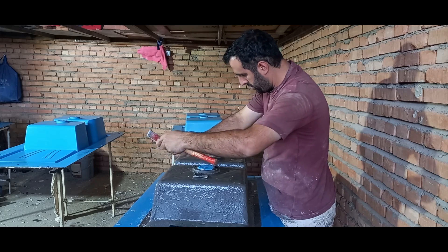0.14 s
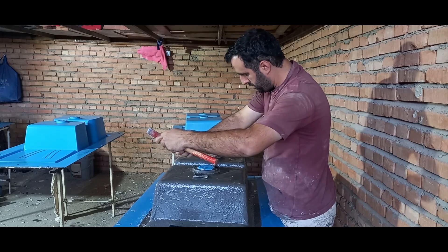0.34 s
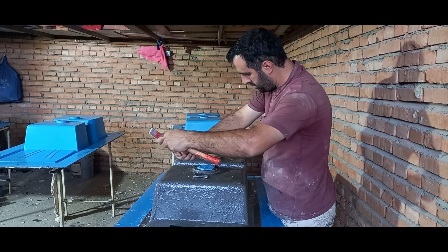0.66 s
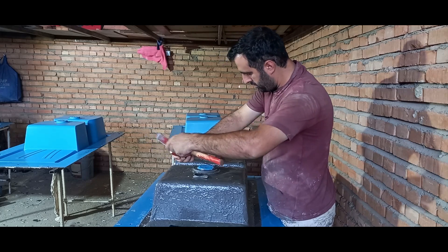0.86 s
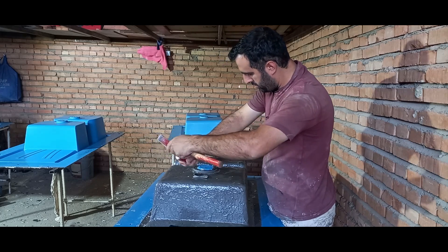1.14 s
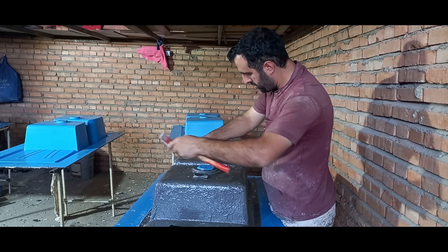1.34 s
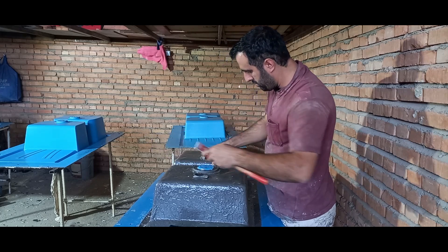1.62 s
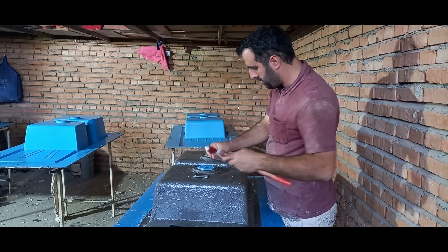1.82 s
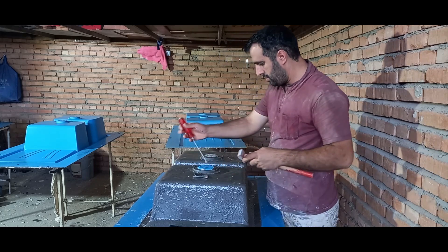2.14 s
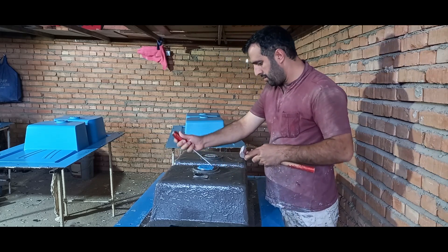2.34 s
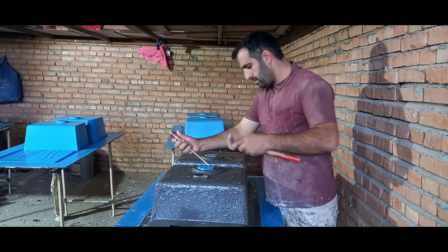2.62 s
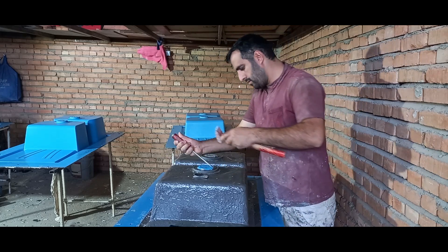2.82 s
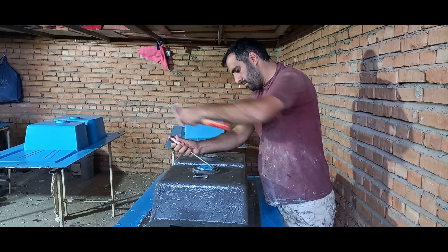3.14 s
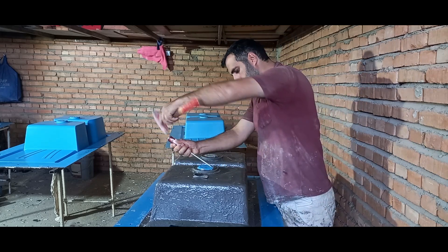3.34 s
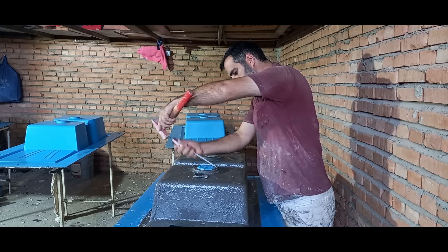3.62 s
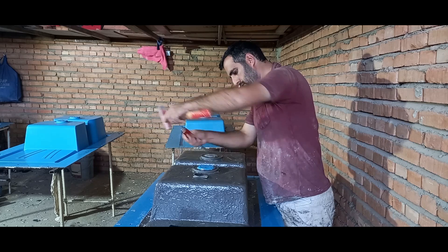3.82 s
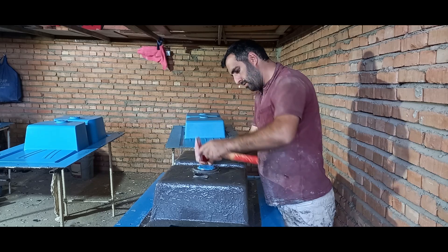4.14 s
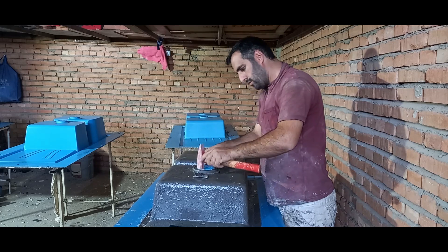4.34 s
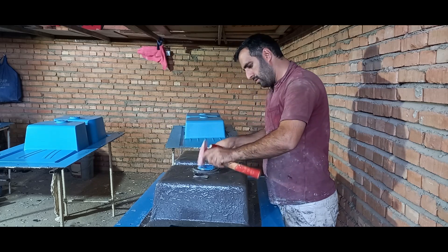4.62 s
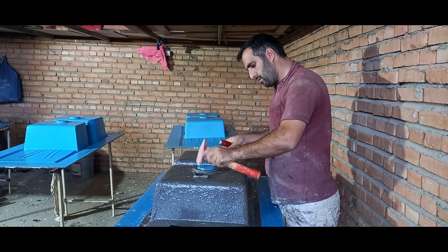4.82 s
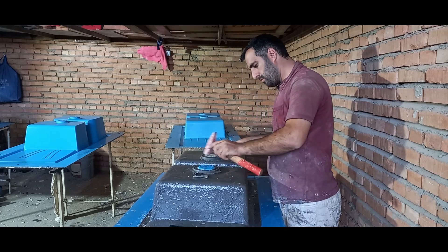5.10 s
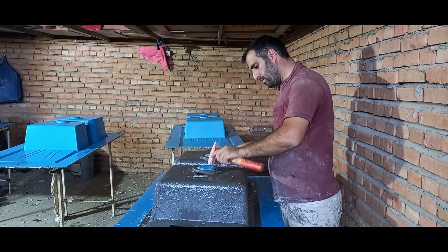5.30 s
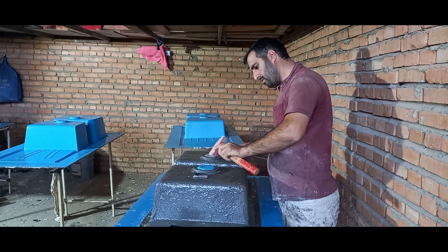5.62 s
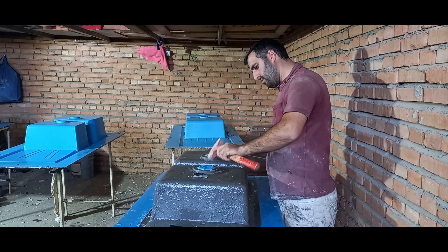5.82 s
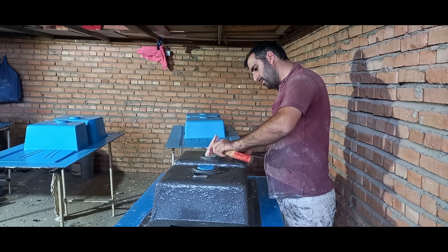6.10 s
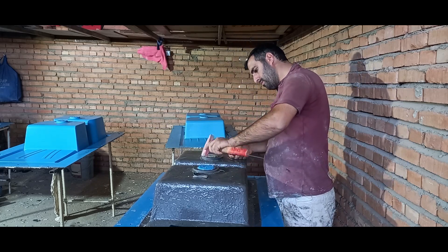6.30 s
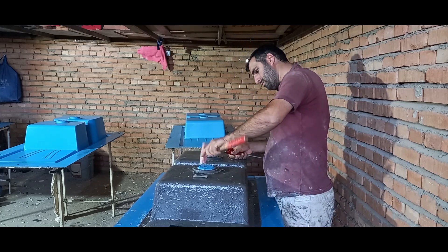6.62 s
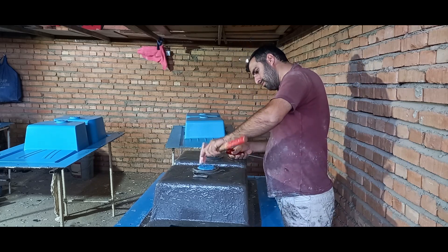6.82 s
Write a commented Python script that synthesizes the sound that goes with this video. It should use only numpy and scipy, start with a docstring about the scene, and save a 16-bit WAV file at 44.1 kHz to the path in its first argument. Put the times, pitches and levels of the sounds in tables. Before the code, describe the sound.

A hammer works on a hollow sink: a fading chisel blow, light blade contact, three cracking steel strikes, then metallic clinks and hand rubs. The blade knocks and scrapes briefly, another hard strike cracks, and a dozen woody taps follow, some bright at the edge, some fuller, with tiny chips pattering. Reverberant brick room, low hum, nearby stereo pickup with loud blows held down by limiting.

```python
"""A hammer drives a screwdriver into hardened resin on an upturned composite sink, in a brick workshop.
Over a low rumble, one chisel strike dies away, the blade is set down, and sharp strikes follow.
Tools clink and hands rub the grips; the blade lands again and skids; one more strike and a clink follow.
Then blunt taps drum on the bowl and make loose chips hop. Hits are sums of decaying modes and noise bursts,
each placed in a reverberant room; a limiter ducks the loud blows and lets the room swell back."""
import sys
import numpy as np
from scipy import signal
from scipy.fft import rfft, irfft, next_fast_len
from scipy.io import wavfile
from scipy.ndimage import uniform_filter1d, minimum_filter1d, map_coordinates

SR = 44100
rng = np.random.default_rng(int(sys.argv[2]) if len(sys.argv) > 2 else 0)


def generate_wav(signal):
    """Clip the signal to [-1, 1] and save it as 16-bit WAV at the path in sys.argv[1]."""
    frames = np.transpose(np.atleast_2d(signal))
    scaled = np.clip(frames, -1, 1) * 32767
    pcm = np.round(scaled).astype(np.int16)
    wavfile.write(sys.argv[1], SR, pcm)


N = 306936
AGE = np.arange(24576) / SR  # time since a hit (s)


def amp(db):
    """Logarithmic level: decibels to amplitude gain."""
    return 10 ** (np.asarray(db) / 20)


def along(points, hz):
    """Logarithmic frequency scale: (Hz, value) points interpolated between octaves."""
    f, v = np.transpose(points)
    return np.interp(np.log(hz + 1), np.log(f), v)


def onset_unit(x):
    """Onset level: scale a hit to rms 1 over its first hundredth of a second."""
    early_power = np.mean(x[..., :SR // 100] ** 2)
    return x / np.sqrt(early_power + 1e-20)


def add(track, s, sound):
    """Superposition: mix a sound into a track from time s, cutting what lies outside it."""
    start = round(s * SR)
    sound = sound[..., max(0, -start):]
    part = track[:, max(0, start):][:, :sound.shape[-1]]
    part += sound[..., :part.shape[1]]


def coloured(x, spectrum):
    """Minimum-phase filtering: the folded cepstrum gives a causal filter of the given spectrum."""
    n = x.shape[-1]
    gain = amp(along(spectrum, np.fft.rfftfreq(n, 1 / SR)))
    cepstrum = irfft(np.log(gain), n)
    cepstrum[1:n // 2] *= 2
    cepstrum[n // 2 + 1:] = 0
    return irfft(rfft(x) * np.exp(rfft(cepstrum)), n)


def evened(x, width_hz):
    """Spectral whitening: level out the chance peaks and dips of a noise's spectrum."""
    spectrum = rfft(x)
    width_bins = max(1, round(width_hz * AGE[-1]))
    power = uniform_filter1d(np.abs(spectrum) ** 2, width_bins)
    return irfft(spectrum / np.sqrt(np.abs(power) + 1e-12))


def ring(modes, attack=.001, scatter_db=1.5):
    """Modal superposition: decaying sinusoids, at slightly new strengths for each blow."""
    hz, db, t60 = np.transpose(modes)[:, :, None]
    db = db + scatter_db * rng.standard_normal(db.shape)
    t = AGE.astype(np.float32)
    decay_rate = np.float32(-np.log(1000) / t60)
    decay = np.exp(decay_rate * np.minimum(t, np.float32(3 * t60)))
    waves = decay * np.sin(np.float32(2 * np.pi * hz) * t)
    return onset_unit((amp(db) * waves).sum(0) * (1 - np.exp(-AGE / attack)))


def crack(spectrum, t60, apart=1.0, attack=0.0039):
    """Impact noise: a random burst, partly different at each ear; a second decay shortens t60."""
    shape = amp(-60 * AGE / t60) * (1 - np.exp(-AGE / attack))
    bursts = evened(rng.standard_normal((3, len(AGE))) * shape, 60)
    shared, left, right = bursts * amp(-60 * AGE / .15)
    return onset_unit(coloured(shared + apart * np.array([left, right]), spectrum))


def strokes(rows, rise, fall):
    """Envelope of friction: gain that swells up to each start, holds, and fades, in dB per second."""
    t = np.arange(N) / SR
    levels = []
    for s, length, db in rows:
        before = np.maximum(s - t, 0)
        after = np.maximum(t - s - length, 0)
        levels.append(db - rise * before - fall * after)
    return amp(np.max(levels, 0).clip(-200))


# likeness of the two sides in a diffuse field: frequency_hz, left_right_correlation [-1 to 1]
ROOM_CORRELATION = [(100, 0.9), (300, 0.87), (700, 0.45), (1300, 0.024), (2500, 0.091), (5000, 0)]


def diffuse(size):
    """Diffuse field: noise from all sides, alike at left and right in the bass only."""
    correlation = along(ROOM_CORRELATION, np.fft.rfftfreq(size, 1 / SR))
    turn = np.arccos(np.clip(correlation, -1, 1)) / 2
    mid, side = rfft(rng.standard_normal((2, size))) * [np.cos(turn), np.sin(turn)]
    return irfft(np.array([mid + side, mid - side]), size)


# decay of the reverberation: frequency_hz, t60_s
ROOM_T60 = [(100, .6), (300, .39), (700, .43), (2000, .43), (5000, .39), (9000, .31), (16000, .27)]


def room_tail(build=0.0082):
    """Reverberant decay: diffuse noise of energy 1, even over frequency; the treble dies first."""
    hz, t, z = signal.stft(diffuse(len(AGE)), SR, nperseg=256)
    decay = amp(-60 * t / along(ROOM_T60, hz)[:, None])
    tail = signal.istft(z * decay, SR, nperseg=256)[1]
    fade_out = np.minimum(1, 2 - 2 * AGE / AGE[-1]) ** 2
    tail = evened(tail, 25.4) * (1 - np.exp(-AGE / build)) * fade_out
    return tail / np.linalg.norm(tail[0])


# early wall echoes: delay_s, left_db, right_db
WALL_ECHOES = [(.0055, -12.5, -13.5), (.0212, -14.5, -13), (.038, -23, -24.5), (.058, -9.5, -16)]


def in_room(hit, wet_db, lead=2, left_db=0.3):
    """Room response: direct sound, earlier (in samples) and louder at left, wall echoes, diffuse tail."""
    response = amp(wet_db) * room_tail()
    response[[0, 1], [0, round(lead)]] += amp([left_db, -left_db])
    # rough brick scatters the treble, so that only the bass comes back as a clear echo
    echo = signal.windows.hann(21) / 10
    for delay, left_echo_db, right_echo_db in WALL_ECHOES:
        add(response, delay, amp([[left_echo_db], [right_echo_db]]) * echo)
    return signal.fftconvolve(hit, response, axes=1)


# spectrum of the workshop's background: frequency_hz, relative_level_db
HUM_SPECTRUM = [(25, -40), (50, -19), (70, -12), (93, 0), (115, -11), (210, -14), (320, -20), (900, -22),
                (1500, -29), (3000, -37), (6000, -45), (10000, -50), (13000, -43), (16000, -45)]


def background(level_db=-43):
    """Stationary noise: a low steady rumble with faint hiss."""
    noise = coloured(diffuse(next_fast_len(N, real=True)), HUM_SPECTRUM)[:, :N]
    return amp(level_db) * noise / noise.std()


# hands shift on the tool grips: start_s (full level reached), length_s, level_db
RUBS = [(1.668, 0.023, -34.5), (1.89, 0.007, -35), (1.956, 0.0096, -39.5)]
RUB_RISE_DB_PER_S, RUB_FALL_DB_PER_S = 448, 270
# spectrum of their rub: frequency_hz, relative_level_db
GRIP_SPECTRUM = [(150, 1.5), (450, 3), (1000, -14), (2000, -6), (4000, -16.5), (8000, -19.5), (16000, -34)]


def handling(rough_db=3, catches_per_s=140):
    """Friction noise: palms rub over the tool grips at a randomly uneven level."""
    catch_times = [np.arange(N) * catches_per_s / SR]
    catches = map_coordinates(rng.standard_normal(N), catch_times, order=1)
    noise = coloured(diffuse(next_fast_len(N, real=True)), GRIP_SPECTRUM)[:, :N]
    rub = noise * amp(rough_db * catches)
    return strokes(RUBS, RUB_RISE_DB_PER_S, RUB_FALL_DB_PER_S) * rub / rub.std()


# tools clink and flakes land: start_s, strength_db,
# brightness_db (tick up, clack and steel ring down), ping_over_tick_db (before their own trims)
CLINKS = [(0.0782, -44, -4.5, -17), (0.4045, -55.5, 8, -15), (1.2618, -38.5, 12.5, -31),
          (1.3892, -30, 4, -21), (1.4948, -38.5, -4, -14), (1.6842, -30, 7, -10.5),
          (1.772, -46.5, -2.5, -12), (1.8543, -41.5, 3, -27), (1.8904, -43.5, -5, -18), (1.95, -31, 6, -8),
          (2.0059, -29.5, -1, -15), (2.0253, -19.5, -6, -20), (3.5437, -28, -7, -20), (3.656, -51, -1, -17)]
# modes of steel touching steel: frequency_hz, relative_level_db, t60_s
STEEL_MODES = [(990, -16, 0.013), (1400, -17, .02), (1790, 5, 0.017), (2640, 2, 0.02), (2960, -6, 0.025),
               (3700, 9.5, 0.037), (4440, 10.5, 0.025), (4580, 15, 0.012), (5290, 11.5, 0.021),
               (6000, 2, 0.04), (6650, 5.5, .03)]
# thin high ring of a light steel contact: frequency_hz, relative_level_db, t60_s
PING_MODES = [(5880, 8.5, 0.11), (7200, -1, 0.074), (13850, -7, .04), (14350, 10.5, .07)]
# spectra of a hard contact and of a small bright one: frequency_hz, relative_level_db
CLACK_SPECTRUM = [(300, -5.5), (800, 0), (1400, 2), (2000, 0), (3000, -2), (4500, -8), (8000, -18),
                  (16000, -56)]
FINE_TICK_SPECTRUM = [(1500, -6), (4000, 1), (7000, 4.5), (10000, -3), (14500, 2.5), (16000, -0.5)]
CLINK_T60_S = 0.039  # contact noise, before the burst's second decay


def clinks():
    """Light impact: small bright contacts of tools and flying flakes; brightness trades ring for tick."""
    track = np.zeros((2, N))
    for s, db, bright, ping in CLINKS:
        low = amp(-5) * ring(STEEL_MODES, attack=0.00044)
        low = low + amp(-1) * crack(CLACK_SPECTRUM, CLINK_T60_S, attack=0.0001)
        high = amp(ping) * ring(PING_MODES, attack=.0005)
        high = high + amp(-2.0) * crack(FINE_TICK_SPECTRUM, CLINK_T60_S, attack=0.0005)
        contact = amp(-bright) * low + amp(bright) * high
        add(track, s, amp(db) * in_room(contact, wet_db=-3.0))
    return track


# the blade is dragged over the sink: start_s (full pressure reached), length_s, relative_level_db
SKIDS = [(2.47, 0.062, -27.5), (2.563, 0.0086, -20), (2.632, 0.098, -23), (2.868, 0.063, -24.5)]
SKID_RISE_DB_PER_S, SKID_FALL_DB_PER_S = 602, 598
# the sink's upper modes, a knock: frequency_hz, relative_level_db, t60_s
KNOCK_MODES = [(490.8, -5.5, 0.067), (546.8, -0.5, 0.058), (618.2, -9, 0.13), (715.3, 5.5, 0.034),
               (748, -5.5, 0.056), (889, -8, 0.031), (1109, -18.5, 0.062)]


def skid(slips_per_s=110, level_db=-5, grit_db=-7):
    """Stick-slip: the dragged blade slips at uneven moments; every slip rings the sink's base."""
    slips = (rng.random(N) < slips_per_s / SR) * rng.uniform(0.46, 1, N)
    slip = ring(KNOCK_MODES[3:], attack=0.0068) + amp(grit_db) * crack(CLACK_SPECTRUM, t60=0.07)
    scrape = signal.fftconvolve(slips[None], slip, axes=1)[:, :N]
    pressure = amp(level_db) * strokes(SKIDS, SKID_RISE_DB_PER_S, SKID_FALL_DB_PER_S)
    return in_room(pressure * scrape / scrape.std(), wet_db=-7.0)[:, :N]


# the blade is set on the sink: start_s, relative_strength_db,
# hardness_db (more contact noise and less thud), settling_bump_db (relative to the tip)
TOUCHES = [(0.027, -26, 11.5, -1.5), (0.22, -17, 2, -3), (2.109, -22.5, -9.5, -26.5), (2.404, -8, 1.5, 0.5),
           (2.561, -24, 6, -30.5), (2.629, -16.5, 7.5, 1), (2.73, -19, -3, -10.5), (2.838, -26.5, 1, 2.5),
           (2.892, -18.5, -7, 8.5), (4.23, -33.5, -5.5, -18)]
# the sink's middle modes, a thud: frequency_hz, relative_level_db, t60_s
THUD_MODES = [(102, -27, 0.49), (137.8, -19, 0.38), (206.1, -9.5, 0.14), (274, -3, 0.17), (314, 6, 0.091),
              (335, -1.5, 0.049)]
# the screwdriver's shaft when struck: frequency_hz, relative_level_db, t60_s
SHAFT_MODES = [(2214, -1, 0.0092), (2270, -6.5, 0.015), (2350, -14, 0.015), (2590, -6.5, 0.0085),
               (2940, -10.5, 0.013)]
# spectrum of a sharp contact: frequency_hz, relative_level_db
TICK_SPECTRUM = [(800, -32), (2500, 9), (4200, 6), (6000, 1.5), (8000, 4.5), (9500, -5.5), (13000, -4),
                 (15500, -8.5)]
SETTLE_S, SETTLE_SOFTER_DB = .028, 9.5  # the blade drops flat this long after its tip, less hard


def touches():
    """Double impact: the blade is set down tip first, then settles flat with a duller bump."""
    track = np.zeros((2, N))
    for start, strength, hardness, settle in TOUCHES:
        tip = (start, strength, hardness)
        flat = (start + SETTLE_S, strength + settle, hardness - SETTLE_SOFTER_DB)
        for s, db, hard in (tip, flat):
            bowl = amp(-15 - hard) * ring(THUD_MODES, attack=0.0034)
            bowl = bowl + amp(-3.5) * ring(KNOCK_MODES[3:], attack=0.0011)
            blade = amp(-2.5) * crack(CLACK_SPECTRUM, t60=0.17)
            blade = blade + amp(-6) * ring(SHAFT_MODES, attack=0.00053)
            contact = amp(-12) * blade + amp(-21) * crack(TICK_SPECTRUM, t60=0.015)
            add(track, s, amp(db - 3.0) * in_room(bowl + amp(0.54 * hard) * contact, wet_db=-4.0))
    return track


# chisel strikes, the first begun before time zero: start_s, relative_strength_db, then
# by where the blade stands, relative to it: boom_db, thud_db, knock_db, shaft_ring_db
CHISEL_STRIKES = [(-0.2, -22, -9, -7, 3.5, 0), (0.552, -23, -14, 0.5, 2, 3),
                  (0.88, -19.5, -25, -6.5, -5, -9.5), (1.163, -21.5, -28.5, -15.5, -4, 0.5),
                  (3.476, -19.5, -51, -1, 1.5, -17)]
# the sink's lowest modes, a boom: frequency_hz, relative_level_db, t60_s
BOOM_MODES = [(105, 1, 0.29), (128.6, -1, 0.47), (186.5, 4.5, 0.17), (214.3, 2.5, 0.4)]
# the hammer head's own ring: frequency_hz, relative_level_db, t60_s
HEAD_MODES = [(8211, 0, .25)]
HEAD_DB = -23


def chisel():
    """Modal excitation by place: steel rings shaft and head; the blade cracks resin and shakes the sink."""
    track = np.zeros((2, N))
    for s, db, boom, thud, knock, shaft in CHISEL_STRIKES:
        sink = amp(boom + 3.0) * ring(BOOM_MODES, attack=0.019)
        sink = sink + amp(thud - 6) * ring(THUD_MODES, attack=0.026)
        sink = sink + amp(knock) * ring(KNOCK_MODES, attack=0.0049)
        steel = amp(shaft + 2.5) * ring(SHAFT_MODES, attack=0.0025)
        steel = steel + amp(HEAD_DB) * ring(HEAD_MODES, attack=.0005)
        resin = amp(1) * crack(CLACK_SPECTRUM, t60=0.028, attack=0.0016)
        resin = resin + amp(-2.5) * crack(TICK_SPECTRUM, t60=0.017, attack=0.00084)
        add(track, s, amp(db + 2.5) * in_room(sink + steel + resin, wet_db=0.5))
    return track


# spectrum of falling chips: frequency_hz, relative_level_db
CHIPS_SPECTRUM = [(1000, -3), (3000, -7.5), (4800, 0.5), (6300, -4), (7800, -4.5), (9500, -16.5),
                  (13000, -17), (16000, -20)]


def loose_chips(rate=450, flight=0.066):
    """Random arrivals: thrown chips patter down after uneven flights (s); stray hops are the smallest."""
    landing = np.exp(-(np.log((AGE + 1e-6) / flight) / .4) ** 2 / 2)
    falls = rng.random(len(AGE)) < rate * landing / SR  # rate is the peak, per second
    impacts = falls * np.sqrt(landing) * rng.standard_normal((2, len(AGE)))
    patter = coloured(impacts, CHIPS_SPECTRUM)
    return patter / np.sqrt(np.mean(patter ** 2) / np.mean(landing ** 2) + 1e-20)


# hammer taps on the bowl: start_s, relative_strength_db, knock_over_thud_db (before trims),
# edge_db (above 0 the rim of the face lands, below 0 its flat)
TAPS = [(4.371, -22.5, -8, 2.5), (4.566, -24, 8, -1.5), (4.771, -10, 6.5, -9.5), (4.978, -12.5, -1.5, 3.5),
        (5.352, -10.5, 8, -9.5), (5.587, -8, 7.5, -7), (5.819, -12.5, 8.5, 1.5), (6.057, -13, 6.5, 6.5),
        (6.264, -12.5, 9, 1), (6.479, -15, 9, 6), (6.71, -14, 3, 5.5), (6.924, -18.5, 2.5, 5.5)]
# spectrum of a blunt contact: frequency_hz, relative_level_db
DULL_CLACK_SPECTRUM = [(300, -16.5), (800, 6), (1400, 2), (1900, -2.5), (2600, -14.5), (4500, -31),
                       (8000, -51.5), (16000, -73)]
# dB lost per dB of edge: a flat blow slaps harder and throws more chips
CLACK_PER_EDGE, CHIPS_PER_EDGE = 0.65, 0.45
# build-up at edge 0: the heavy low modes take longer to get going
THUD_RISE_S, KNOCK_RISE_S = 0.0066, 0.0058
RISE_DB_PER_EDGE = 0.36  # a blow that lands on its rim builds up more slowly


def taps():
    """Forced drumming: blunt blows excite the hollow bowl's modes and shake up loose chips."""
    track = np.zeros((2, N))
    for s, db, knock, edge in TAPS:
        slow = amp(RISE_DB_PER_EDGE * edge)
        bowl = amp(0.5) * ring(THUD_MODES, attack=slow * THUD_RISE_S)
        bowl = bowl + amp(knock - 2.65) * ring(KNOCK_MODES, attack=slow * KNOCK_RISE_S)
        slap = amp(-7.5 - CLACK_PER_EDGE * edge) * crack(DULL_CLACK_SPECTRUM, t60=0.053, apart=0.83)
        tick = amp(edge - 16.0) * crack(TICK_SPECTRUM, t60=0.04)
        chips = amp(-29.5 - CHIPS_PER_EDGE * edge) * loose_chips()
        add(track, s, amp(db + 12.5) * in_room(bowl + slap + tick + chips, wet_db=-3.5))
    return track


def scene():
    """Superposition: all the work at the sink, over the workshop's background."""
    return background() + handling() + clinks() + skid() + touches() + chisel() + taps()


TOP_HZ = 16000  # upper band limit


def record(dry, threshold_db=-6, release_db_per_s=75, quick_range_db=7,
           slow_release_db_per_s=4, low_cut_hz=55):
    """Dynamic compression: bass cut, limiter with quick then slow recovery, rounded peaks, band limit."""
    sound = signal.sosfilt(signal.butter(2, low_cut_hz, "highpass", fs=SR, output="sos"), dry)
    power = np.abs(uniform_filter1d(np.mean(sound ** 2, 0), size=131))
    over = np.maximum(10 * np.log10(power + 1e-12) - threshold_db, 0)
    t = np.arange(N) / SR

    def held(db, rate):
        """Peak hold: follow rises at once, fall at a steady dB per second."""
        return np.maximum.accumulate(db + rate * t) - rate * t

    quick = held(over, release_db_per_s)
    slow = held(over - quick_range_db, slow_release_db_per_s)
    gain = minimum_filter1d(amp(-np.maximum(quick, slow)), size=65)
    sound = sound * uniform_filter1d(gain, size=65)
    sound = sound / (1 + np.abs(sound) ** 6) ** (1 / 6)  # rounds the peaks below 1
    m = next_fast_len(N + SR // 10)
    in_band = np.fft.rfftfreq(m, 1 / SR) < TOP_HZ
    return irfft(rfft(sound, m) * in_band, m)[:, :N]


dry = scene()
out = record(dry)
generate_wav(out)
```